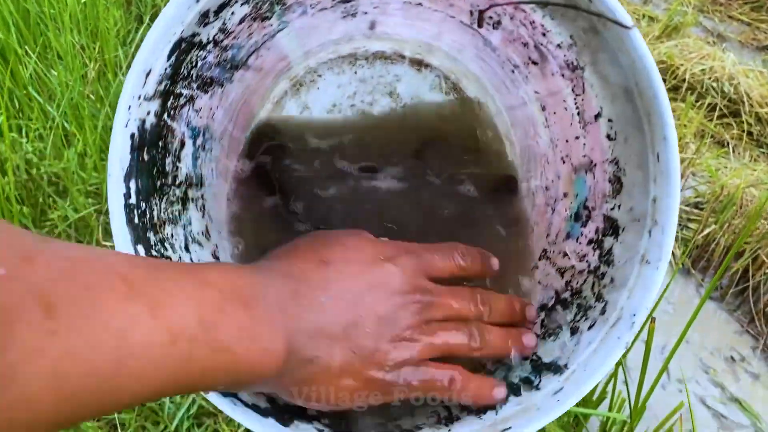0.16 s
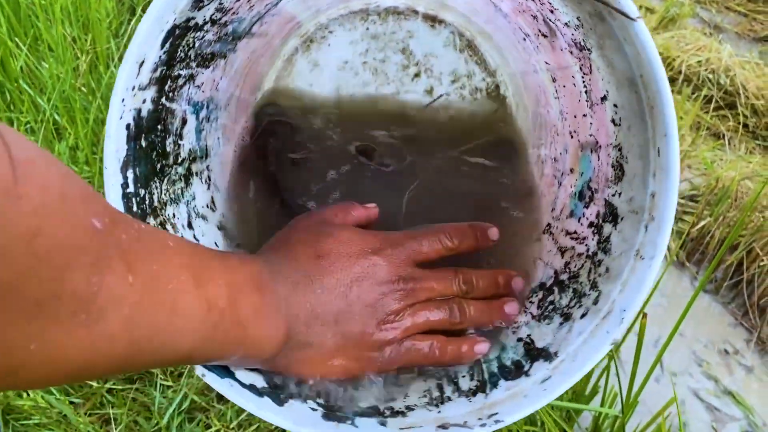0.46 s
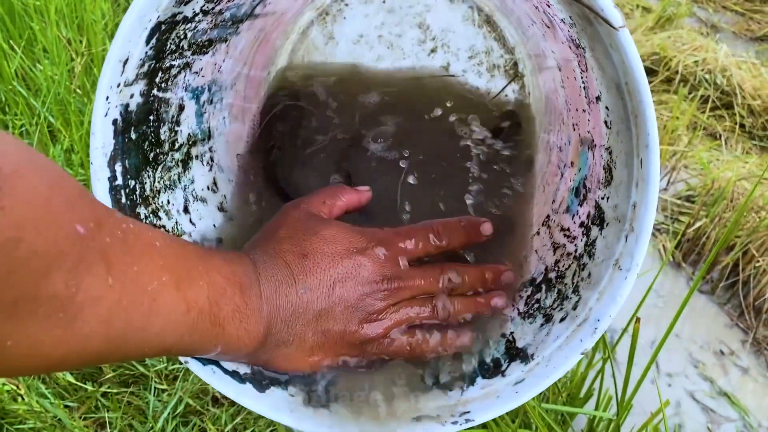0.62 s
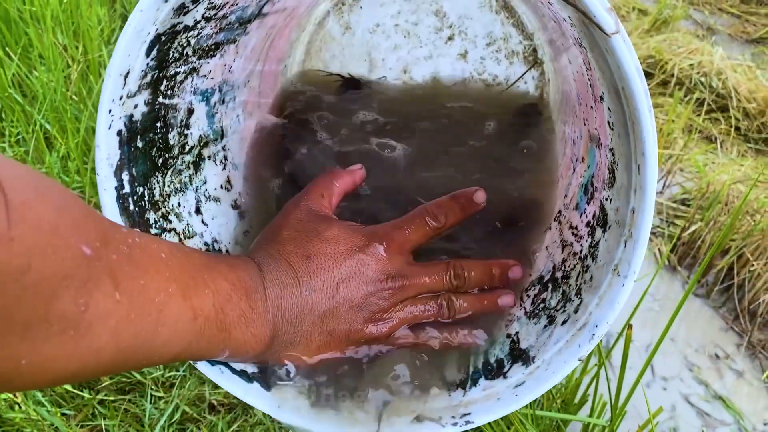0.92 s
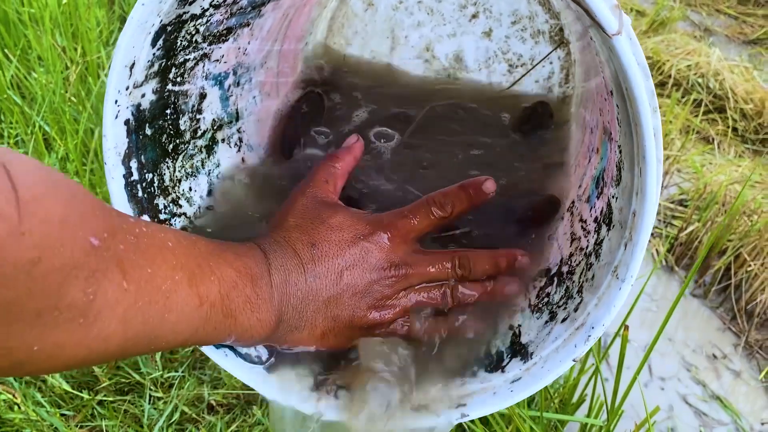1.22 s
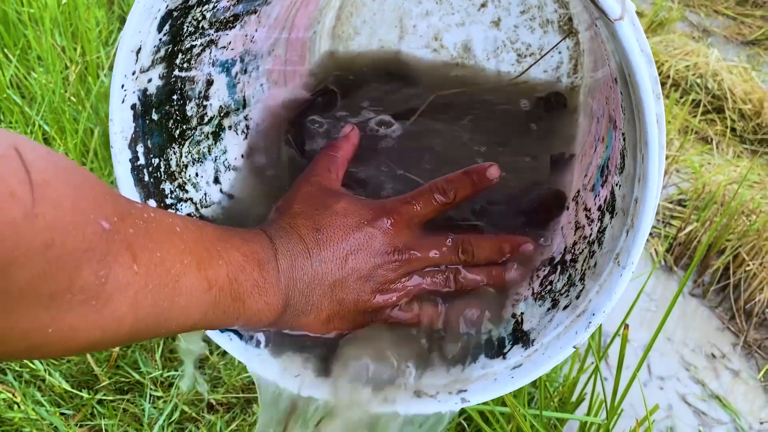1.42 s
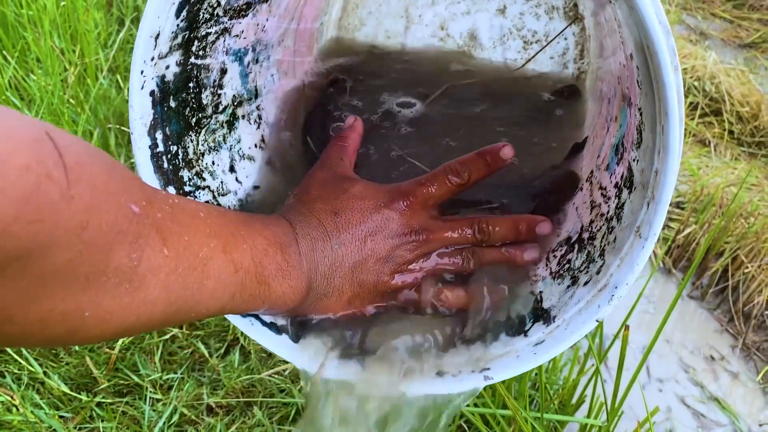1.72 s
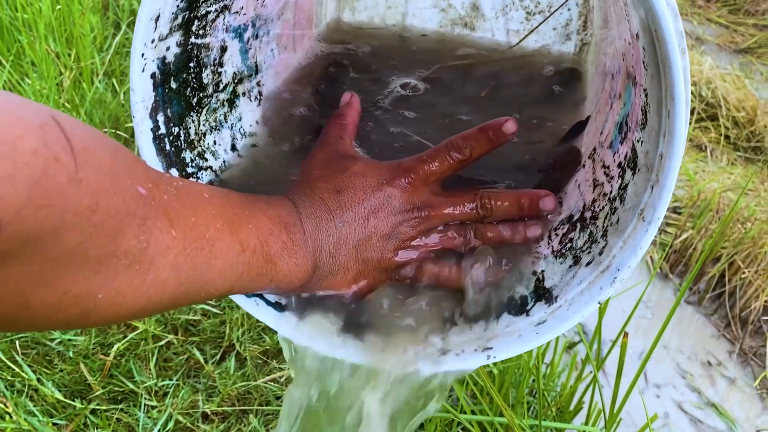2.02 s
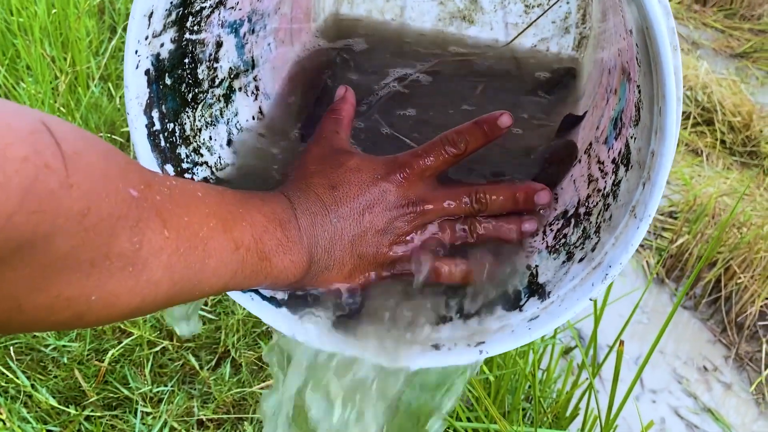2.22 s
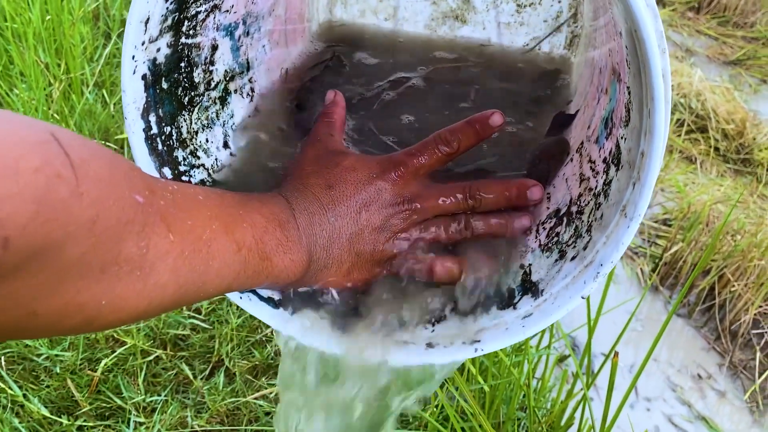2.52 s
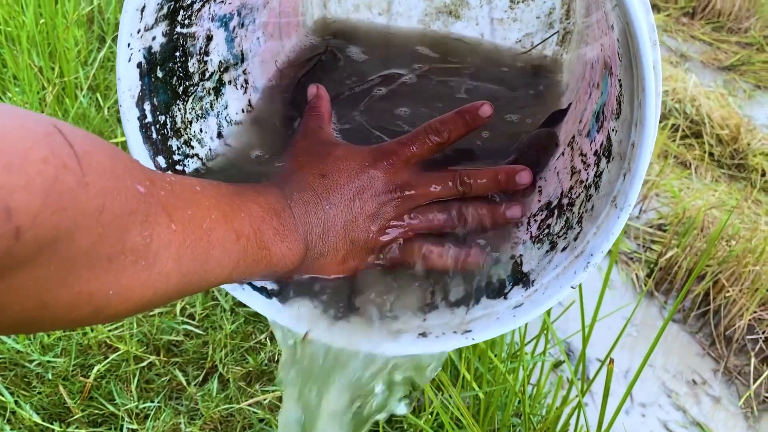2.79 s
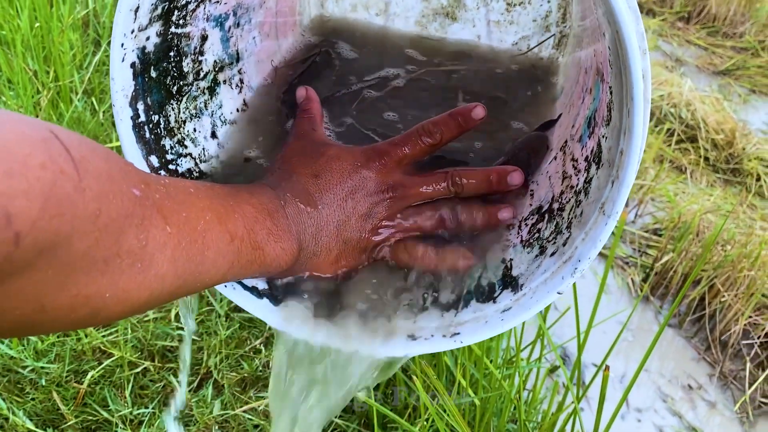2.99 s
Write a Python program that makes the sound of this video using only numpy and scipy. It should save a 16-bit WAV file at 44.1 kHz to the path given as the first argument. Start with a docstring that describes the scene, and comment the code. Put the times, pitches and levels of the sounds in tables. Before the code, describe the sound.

Water pours from a plastic bucket onto grass outdoors, heard close and dry. A first spill patters, crackles and gulps until about 0.45 s, with a sharp splat near 0.43. The flow thins while water slaps the wall, with hollow knocks and deep gulps strongest around 1.15-1.3. From 1.5 a steady bright stream splatters and bubbles to the end near 3 s, over low buffeting and soft thumps.

```python
"""A first spill of muddy water patters, crackles and gulps onto grass and dies away, heard in open air.
Water then slaps and gulps round a hand in the plastic bucket; damped modes give the hollow ring.
A steady stream follows: filtered random drops and bubbles, with noise-burst splats.
Modulated low noise and decaying sines make the buffeting and thumps underneath."""
import sys
import numpy as np
from scipy import signal
from scipy.fft import rfft, irfft
from scipy.io import wavfile

SR = 44100
rng = np.random.default_rng(int(sys.argv[2]) if len(sys.argv) > 2 else 0)


def to_wav(s):
    """Save 16-bit WAV."""
    ch = np.atleast_2d(s).T  # columns
    pcm = np.round(np.clip(ch, -1, 1) * 32767)  # PCM
    wavfile.write(sys.argv[1], SR, pcm.astype(np.int16))


N = 138915

# Spectrum columns hold relative density; trims in dB are added to the levels of their source.
# Flow over the rim: (time [s], patter level before trim [dB])
FLOW = [(0.0,-37.5), (0.2,-36), (0.3,-37), (0.42,-37.5), (0.46,-46.5), (0.5,-58), (0.54,-40.5), (0.61,-59),
        (0.69,-55.5), (0.79,-57.5), (0.925,-64), (.96,-46.5), (1.05,-42), (1.17,-41.5), (1.43,-41),
        (1.53,-34.5), (1.79,-36.5), (2.34,-36.5), (3.15,-37)]
# Spectrum of the patter on grass: (frequency [Hz], density [dB per Hz])
PATTER_SPECTRUM = [(710, -11), (1200, -11), (1370, -22.5), (1510, -3.5), (2010, -11.5), (2320, -2.5),
                   (2550, -8.5), (3200, 2), (3610, -3), (4930, 0.5), (6120, -7.5), (7190, -4.5),
                   (10800, -3), (14500, -8), (15800, -12)]
PATTER_TRIM_DB, SPRAY_DB = -1.5, -1.5  # spray is relative to the drops
DROPS_PER_S, DROP_SPREAD_DB = 3000, 5  # drop rate at the strongest flow
THINNING = 0.69  # the drop rate follows this power of the flow
SURGE_DB, SURGE_POINTS_PER_S = 1.7, 69.65

# Spectrum of tiny bubbles bursting where the stream lands: (frequency [Hz], density [dB per Hz])
FIZZ_SPECTRUM = [(1200,-13.5), (2300,-8), (3200,-7.5), (4900,-4.5), (6200,-15), (9000,-9), (14000,-18)]
FIZZ_TRIM_DB, FIZZ_PER_S, FIZZ_CYCLES, FIZZ_SPREAD_DB = -6.5, 600, 30.3, 4.5
FIZZ_RISE = 0.03  # share by which the pitch of a fizz or crackle bubble rises

# Coarser bubbles of the first spill: (time [s], level [dB])
CRACKLE_LEVEL = [(0,-50), (.11,-38), (.23,-41), (.32,-46), (.41,-58), (.6,-53), (.72,-71), (.8,-62),
                 (.85,-52), (.93,-68), (1.1,-63), (1.35,-66), (1.6,-70)]
# Spectrum of the crackle: (frequency [Hz], density [dB per Hz])
CRACKLE_SPECTRUM = [(1200,-1.5), (1900,-3), (2900,-0.5), (3800,-3.5), (5500,-7)]
CRACKLE_PER_S, CRACKLE_CYCLES = 650, 21

# Churning middle-sized bubbles: (time [s], level before trim [dB])
CHURN_LEVEL = [(0.0, -49), (0.07, -46), (0.17, -41), (0.45, -53), (0.67, -55), (0.84, -53), (1.03, -49.5),
               (1.6, -50), (1.82, -48.5), (2.79, -41), (3.07, -42.5), (3.15, -48)]
# Spectrum of the churning: (frequency [Hz], density [dB per Hz])
CHURN_SPECTRUM = [(190, -37.5), (330, -4), (557, 1), (643, -1), (718, 4.5), (1200, 0), (1330, -4.5),
                  (2200, -13), (2860, -17), (4840, -120)]
CHURN_TRIM_DB, CHURN_PER_S, CHURN_CYCLES, CHURN_SPREAD_DB, CHURN_RISE = -1, 900, 26.2, 4, 0.6

# Murmur of the bucket's hollow: (time [s], level before trim [dB])
SLOSH_LEVEL = [(0.0,-41), (.3,-45), (.75,-49), (0.92,-46.5), (1.06,-38), (1.3,-44.5), (1.6,-44), (1.8,-48),
               (2.45,-52), (2.8,-49), (2.95,-52), (3.15,-48)]
# Spectrum of the murmur: (frequency [Hz], density [dB per Hz])
SLOSH_SPECTRUM = [(110,-19.5), (165,-8.5), (220,1.5), (280,-4), (380,-27.5), (700,-35.5)]
SLOSH_TRIM_DB = -1

# Strength of the low buffeting: (time [s], level [dB])
BUFFET_LEVEL = [(0,-40.5), (.65,-39.5), (1.2,-43), (1.45,-43.5), (2.2,-42), (2.55,-39), (2.85,-41.5),
                (3.15,-45.5)]
# Spectrum of the buffeting: (frequency [Hz], density [dB per Hz])
BUFFET_SPECTRUM = [(20,-67), (40,-14), (60,1.5), (80,-5), (105,-6), (150,-14.5), (250,-23.5), (500,-71.5)]
# Soft low thumps: (time [s], peak level [dB], frequency [Hz], t60 [s])
THUMPS = [(.725,-27.5,66,0.075), (0.844,-25.5,94,0.097), (0.87,-21,76,0.049), (2.548,-27,65,0.097)]
THUMP_RISE_S = 0.0066

# Pockets of trapped air:
# (time [s], start frequency [Hz], end frequency [Hz], swell [s], fade [s], peak level [dB])
GULPS = [(.028,1230,1140,0.0033,0.028,-36.5), (0.055,257,255,0.014,0.042,-23),
         (.07,482,420,0.011,0.022,-29), (.074,371,282,0.03,0.081,-15.5), (.086,770,560,0.012,0.027,-26.5),
         (.120,250,161,0.011,0.084,-19), (.272,720,840,0.0044,0.052,-29.5), (.288,910,1130,0.009,0.016,-32),
         (0.432,4280,3870,0.00078,.008,-15), (.497,586,606,0.0029,0.04,-31.5),
         (.536,614,613,0.0039,0.03,-25), (.574,650,520,0.0018,0.027,-30),
         (0.592,3220,3430,0.0018,0.017,-35.5), (0.636,180,230,0.009,0.028,-28),
         (.643,298,464,0.015,0.046,-22), (0.667,435,533,0.0091,0.023,-22), (.728,6900,6600,.001,.008,-30.5),
         (.741,2630,2360,0.0015,0.012,-34), (.822,855,920,0.01,0.012,-23), (.83,1280,1180,.003,.015,-32),
         (.856,940,850,.008,0.046,-37), (1.086,1620,1480,0.0026,.02,-34),
         (1.184,274,212,0.0084,0.053,-13.5), (1.294,230,205,0.0066,.04,-17.5),
         (1.527,1650,1780,0.0023,0.011,-35), (1.586,244,171,0.0064,0.029,-17),
         (1.621,870,972,0.0037,0.0078,-27), (1.888,840,760,0.0033,0.029,-35.5),
         (2.312,2400,2500,0.00092,.008,-19), (2.322,1056,1250,0.0034,0.028,-31.5),
         (2.484,530,610,0.0058,.022,-29), (2.541,241,191,0.0045,0.064,-30),
         (2.658,880,1090,0.0045,0.011,-23.5), (2.695,1600,1900,0.002,.02,-29),
         (2.77,646,785,0.0038,0.025,-30.5), (2.895,208,253,0.0067,0.097,-32),
         (2.905,132,161,0.014,0.046,-31.5), (2.94,241,260,0.009,0.096,-31.5),
         (3.115,201,255,0.035,0.084,-28.5)]
GULP_WOBBLE, GULP_WOBBLE_POINTS_PER_S = 0.05, 270  # wobble is a share of the pitch

# Water slapping the bucket wall, levels before trim:
# (time [s], hollow level [dB], wall level [dB], splash level [dB], splash t60 [s])
SLAPS = [(.050,-38,-30,-40.5,.03), (.110,-47,-29.5,-33,0.03), (.204,-31.5,-28.5,-28.5,0.076),
         (.362,-38,-34,-39,0.061), (0.432,-46,-44,-24,0.068), (0.447,-41.5,-44,-37,0.013),
         (0.486,-41,-37,-32.5,0.061), (.527,-40,-32.5,-34,0.11), (.574,-33.5,-32.5,-41,0.046),
         (.608,-40,-44,-42,0.028), (.644,-33,-45,-42.5,0.089), (.670,-48,-34,-40,0.032),
         (.730,-53,-54,-43.5,0.017), (.809,-59,-45,-43,0.061), (.825,-40,-32,-45,.05),
         (.973,-34,-35.5,-36.5,0.057), (1.049,-43,-33.5,-44,0.059), (1.091,-57,-35.5,-33.5,0.099),
         (1.143,-24.5,-23,-31,0.048), (1.189,-32,-31,-36,0.035), (1.285,-29,-32.5,-25,0.03),
         (1.324,-28,-32.5,-34.5,.025), (1.376,-44,-49,-49,.04), (1.431,-49,-41,-60,.04),
         (1.461,-33.5,-40.5,-39,0.091), (1.578,-37,-35,-34,0.15)]
# Resonances of the air in the bucket: (frequency [Hz], t60 [s], relative level [dB])
HOLLOW_MODES = [(214, 0.11, 6), (246, 0.14, 4), (306.6, 0.11, -3.5)]
# Resonances of the bucket wall: (frequency [Hz], t60 [s], relative level [dB])
WALL_MODES = [(545, 0.036, 9), (609, 0.052, 8.5), (734, 0.026, -25), (775, 0.1, -4)]
# Spectrum of the splash of a slap: (frequency [Hz], density [dB per Hz])
SPLASH_SPECTRUM = [(250, -15.5), (500, -3.5), (950, 4), (1150, -2), (1380, 0.5), (1800, -7), (2500, -13.5),
                   (4000, -45), (9000, -31)]
HOLLOW_TRIM_DB, WALL_TRIM_DB, SPLASH_TRIM_DB = -1.5, -4.5, -4.5
HOLLOW_RISE_S, WALL_RISE_S, SPLASH_RISE_S = 0.0041, 0.0018, 0.00033
MODE_SCATTER = 0.026  # random retuning, as a share of the frequency

# Sheets of water sliding along the wall: (time [s], length [s], level [dB])
WASHES = [(.06, 0.14, -45), (0.804, 0.12, -39.5), (1.08, 0.3, -52), (1.273, 0.048, -36),
          (2.61, 0.13, -40.5)]
# Spectrum of the sliding water: (frequency [Hz], density [dB per Hz])
WASH_SPECTRUM = [(250,7), (550,2), (900,4.5), (1400,-9.5), (2200,-16.5), (4500,-12), (8000,-22),
                 (15000,-29)]
WASH_GRAINS_PER_S = 1500

# Lumps of water landing: (time [s], burst level before trim [dB], centre frequency [Hz], t60 [s])
SPLATS = [(0.126, -19, 1990, 0.021), (0.1538, -21, 4530, .015), (0.227, -19, 4000, 0.028),
          (.268, -16.5, 4600, 0.016), (.372, -26, 2600, 0.059), (0.4308, -7, 3870, 0.013),
          (.447, -24, 5000, .015), (0.464, -24.5, 4970, 0.016), (.502, -30, 9000, 0.017),
          (.522, -24, 6940, 0.015), (0.533, -20.5, 6950, .02), (0.544, -25, 7200, 0.025),
          (0.574, -38, 3900, 0.043), (0.61, -43, 2980, 0.015), (.662, -41, 4340, 0.029),
          (0.719, -23, 14000, 0.019), (0.727, -30, 6800, .018), (0.739, -30, 6000, 0.015),
          (.908, -30.5, 7300, 0.019), (0.947, -31.5, 4860, 0.06), (1.259, -26.5, 9000, 0.014),
          (1.528, -16, 10000, 0.012), (1.594, -34, 4580, 0.06), (2.051, -18, 3240, 0.021),
          (2.076, -21.5, 3200, 0.025), (2.145, -21.5, 4480, .012), (2.167, -7.5, 3500, 0.0056),
          (2.195, -20, 3840, 0.035), (2.23, -21, 4000, 0.033), (2.26, -21.5, 3020, 0.038),
          (2.312, -20, 3180, 0.019), (2.347, -15.5, 3080, 0.017), (2.393, -17.5, 3900, 0.04),
          (2.449, -17.5, 3100, 0.025), (2.569, -20.5, 3450, 0.033), (2.628, -16, 3800, 0.011),
          (2.832, -16, 3440, 0.0095), (3.024, -11, 5260, 0.0092)]
SPLAT_TRIM_DB, SPLAT_SKIRT_DB, SPLAT_RISE_S = -3, -10, 0.0012  # skirt: an octave off the centre

TOP_HZ = 15800


def undb(db):
    """Level: an amplitude ratio is ten to the power of dB over 20."""
    return 10 ** (np.asarray(db) / 20)


def unit(x):
    """Normalization: scale to an rms of 1."""
    return x / np.sqrt(np.mean(x ** 2) + 1e-20)


def blow(x):
    """Energy normalization: give a short sound the energy of 25 ms at an rms of 1."""
    return x / np.sqrt(np.sum(x ** 2) / (.025 * SR) + 1e-20)


def curve(rows):
    """Envelope: interpolate levels in dB over time and return the gain."""
    seconds, db = np.array(rows).T
    return undb(np.interp(np.arange(N) / SR, seconds, db))


def colour(x, spectrum):
    """Minimum-phase filtering: a folded cepstrum makes the chosen spectrum causal."""
    size = 8192
    hz, db = np.array(spectrum, float).T
    log_hz = np.log(np.maximum(np.arange(size // 2 + 1) * SR / size, 1))
    gain = undb(np.interp(log_hz, np.log(hz), db))
    cepstrum = irfft(np.log(gain))
    # fold the negative times onto the positive ones
    cepstrum[1:size // 2] *= 2
    cepstrum[size // 2 + 1:] = 0
    impulse_response = irfft(np.exp(rfft(cepstrum)))
    return signal.fftconvolve(x, impulse_response)[:len(x)]


def walk(points_per_s):
    """Slow random modulation: interpolated random points, scaled to an rms of 1."""
    points = rng.standard_normal(4000)
    return unit(np.interp(np.arange(N) / SR * points_per_s, np.arange(len(points)), points))


def short_time():
    """Time base: a quarter of a second for one event."""
    return np.arange(SR // 4) / SR


def strike(rise, t60):
    """Impulsive excitation: an exponential rise, then a decay of 60 dB in t60."""
    t = short_time()
    return (1 - np.exp(-t / rise)) * np.exp(-np.log(1000) * t / t60)


def add(out, s, x):
    """Superposition: add a sound from its starting time, cut at the end."""
    i = int(np.clip(s * SR, 0, N - 1))
    out[i:i + len(x)] += x[:N - i]


def drops(per_s):
    """Poisson-like impacts: random clicks of unequal size, with equal mean power at any rate."""
    hits = rng.random(N) < per_s / SR
    signs = rng.choice([-1, 1], N)
    sizes = undb(DROP_SPREAD_DB * np.minimum(rng.standard_normal(N), 2))
    return unit(hits * signs * sizes / np.sqrt(per_s))


def bubbles(per_s, low_hz, high_hz, cycles, spread_db, rise):
    """Bubble resonance: random decaying tones rise in pitch; smaller bubbles ring higher and shorter."""
    out = np.zeros(N)
    for when, pitch, size, sign in rng.random((int(per_s * N / SR), 4)):
        hz = low_hz * (high_hz / low_hz) ** pitch
        life = cycles / hz
        t = np.arange(int(life * SR)) / SR
        decay = np.exp(-np.log(100) * t / life)  # 40 dB over the life
        tone = np.sin(2 * np.pi * hz * t * (1 + rise * t / life / 2)) * decay
        gain = hz * undb(spread_db * min(-np.log(1 - size), 3))
        add(out, when * N / SR, np.sign(sign - .5) * tone * gain)
    return out


def patter():
    """Random impacts: drops tick over spray and fizzing bubbles in quick surges, fewer in weak flow."""
    flow = curve(FLOW)
    share = flow / flow.max()
    spray = undb(SPRAY_DB) * np.sqrt(share) * rng.standard_normal(N)
    impacts = drops(DROPS_PER_S * share ** THINNING)
    ticks = unit(colour(impacts + spray, PATTER_SPECTRUM))
    tiny = bubbles(FIZZ_PER_S, 1515, 11430, FIZZ_CYCLES, FIZZ_SPREAD_DB, FIZZ_RISE)
    fizz = unit(colour(tiny, FIZZ_SPECTRUM))
    surges = unit(undb(SURGE_DB * walk(SURGE_POINTS_PER_S)))
    return flow * (undb(PATTER_TRIM_DB) * ticks + undb(FIZZ_TRIM_DB) * fizz) * surges


def crackle(spread_db=4):
    """Bubble resonance: coarser bubbles pop while the water is still splashing about."""
    coarse = bubbles(CRACKLE_PER_S, 1510, 4980, CRACKLE_CYCLES, spread_db, FIZZ_RISE)
    return unit(colour(coarse, CRACKLE_SPECTRUM)) * curve(CRACKLE_LEVEL)


def churn():
    """Bubble resonance: middle-sized bubbles ring in the bucket and in the growing puddle."""
    middle = bubbles(CHURN_PER_S, 321, 2256, CHURN_CYCLES, CHURN_SPREAD_DB, CHURN_RISE)
    return unit(colour(middle, CHURN_SPECTRUM)) * curve(CHURN_LEVEL) * undb(CHURN_TRIM_DB)


def slosh(waver_db=3, waver_points_per_s=25):
    """Noise-driven resonance: moving water keeps the hollow of the bucket humming faintly."""
    waver = undb(waver_db * walk(waver_points_per_s))
    hum = unit(colour(rng.standard_normal(N), SLOSH_SPECTRUM) * waver)
    return hum * curve(SLOSH_LEVEL) * undb(SLOSH_TRIM_DB)


def buffeting(gust_db=2, gust_points_per_s=8):
    """Modulated low noise: an uneven rumble, with decaying low sines as soft thumps."""
    gusts = undb(gust_db * walk(gust_points_per_s))
    out = unit(colour(rng.standard_normal(N), BUFFET_SPECTRUM) * gusts) * curve(BUFFET_LEVEL)
    for s, db, hz, t60 in THUMPS:
        env = strike(THUMP_RISE_S, t60)
        add(out, s, undb(db) * env / env.max() * np.sin(2 * np.pi * hz * short_time()))
    return out


def gulps(fade_db=40):
    """Air-cavity resonance: trapped pockets swell and ring, gliding as they open or close."""
    out, t = np.zeros(N), short_time()
    for s, hz, end_hz, swell, fade, db in GULPS:
        glide = np.interp(t, [0, swell + fade / 2], [hz, end_hz])
        pitch = glide * (1 + GULP_WOBBLE * walk(GULP_WOBBLE_POINTS_PER_S)[:len(t)])
        fall = undb(-fade_db * np.maximum(t - swell, 0) / fade)
        env = np.minimum(t / swell, 1) ** 2 * fall
        add(out, s, undb(db) * env * np.sin(2 * np.pi * np.cumsum(pitch) / SR))
    return out


def ring(modes, rise):
    """Modal superposition: damped modes, slightly retuned by the shifting water."""
    t = short_time()
    total = np.zeros(len(t))
    for hz, t60, db in modes:
        tuned_hz = hz * (1 + MODE_SCATTER * rng.standard_normal())
        total += undb(db) * strike(rise, t60) * np.sin(2 * np.pi * tuned_hz * t)
    return blow(total)


def slaps():
    """Impact excitation: each slap splashes, knocks the wall and sets the hollow ringing."""
    out = np.zeros(N)
    for s, hollow_db, wall_db, splash_db, t60 in SLAPS:
        env = strike(SPLASH_RISE_S, t60)
        splash = blow(colour(env * rng.standard_normal(len(env)), SPLASH_SPECTRUM))
        add(out, s, undb(splash_db + SPLASH_TRIM_DB) * splash)
        add(out, s, undb(wall_db + WALL_TRIM_DB) * ring(WALL_MODES, WALL_RISE_S))
        add(out, s, undb(hollow_db + HOLLOW_TRIM_DB) * ring(HOLLOW_MODES, HOLLOW_RISE_S))
    return out


def washes():
    """Granular flow noise: sliding water swells and fades as a soft grainy swish."""
    t = np.arange(N) / SR
    env = np.zeros(N)
    for s, length, db in WASHES:
        env += undb(db) * np.sin(np.pi * np.clip((t - s) / length, 0, 1))
    return env * unit(colour(drops(WASH_GRAINS_PER_S), WASH_SPECTRUM))


def splats():
    """Impulsive noise: lumps of water burst in a bright crack with a peaked spectrum."""
    out = np.zeros(N)
    for s, db, hz, t60 in SPLATS:
        env = strike(SPLAT_RISE_S, t60)
        low_side = [(hz / 10, -30), (hz / 2, SPLAT_SKIRT_DB)]
        high_side = [(hz * 2, SPLAT_SKIRT_DB), (hz * 5, -17)]
        noise = unit(colour(rng.standard_normal(len(env)), low_side + [(hz, 0)] + high_side))
        add(out, s, undb(db + SPLAT_TRIM_DB) * env * noise)
    return out


def scene():
    """Superposition: all the water and the rumble, in one channel."""
    stream = patter() + crackle() + churn()
    low = slosh() + buffeting()
    events = gulps() + slaps() + washes() + splats()
    return (stream + low + events)[None]


def record(dry):
    """Band limitation: a steep elliptic low-pass cuts the top."""
    low_pass = signal.ellip(10, .2, 80, TOP_HZ, fs=SR, output="sos")  # ripple, stop band [dB]
    return signal.sosfilt(low_pass, dry)


dry = scene()
out = record(dry)
to_wav(out)
```